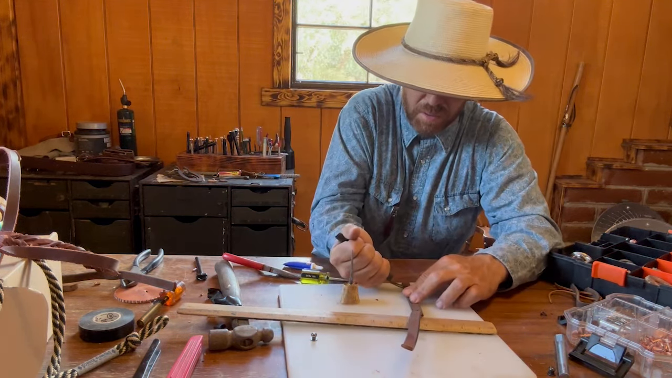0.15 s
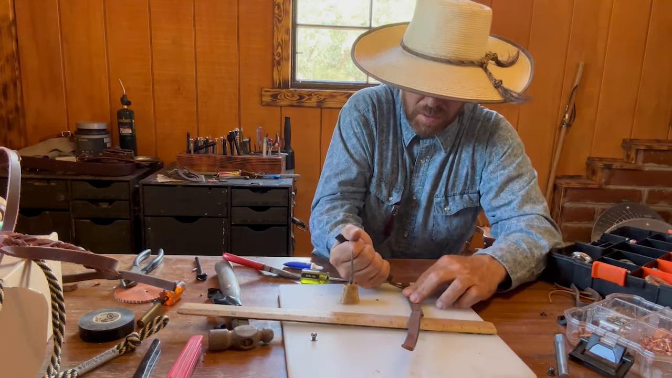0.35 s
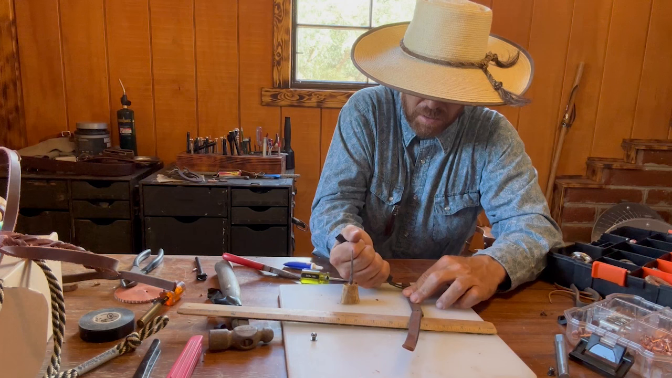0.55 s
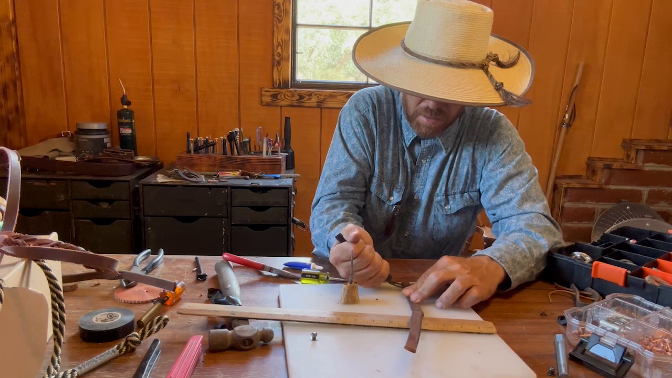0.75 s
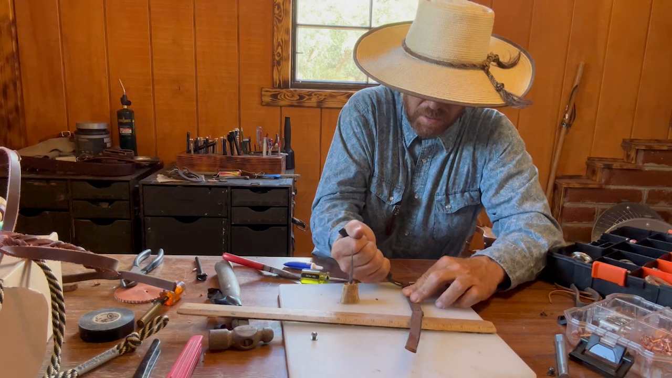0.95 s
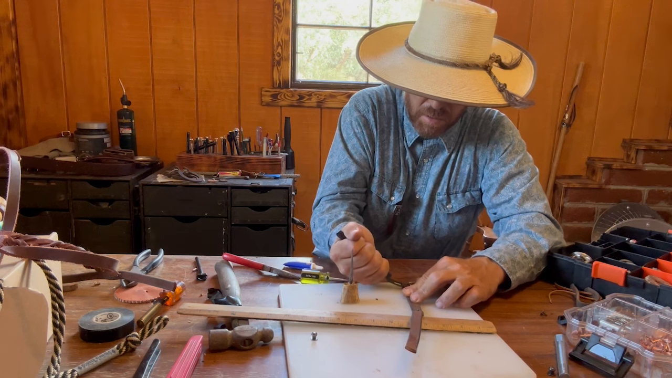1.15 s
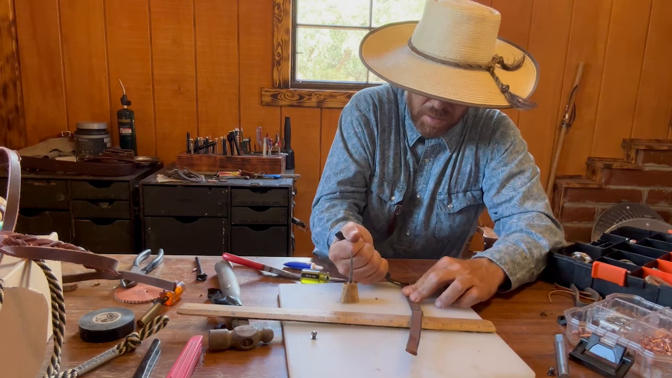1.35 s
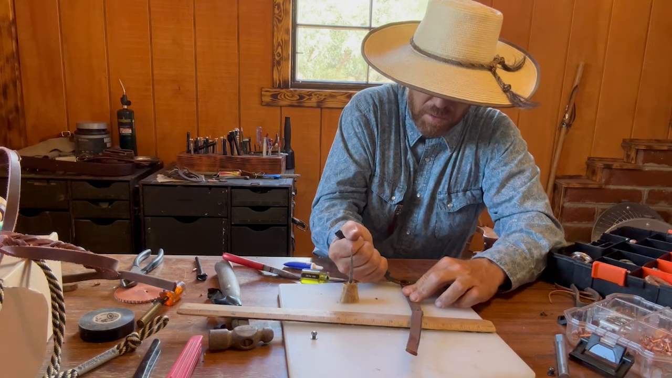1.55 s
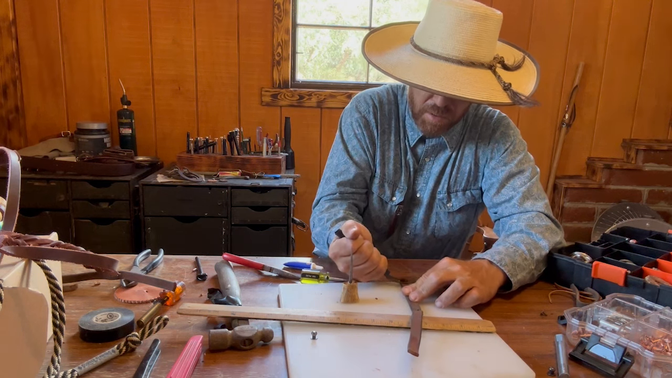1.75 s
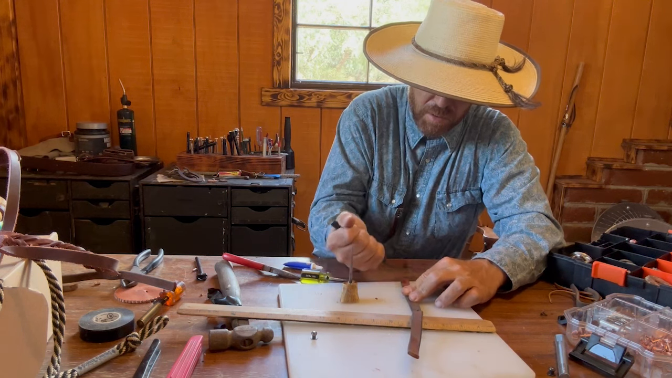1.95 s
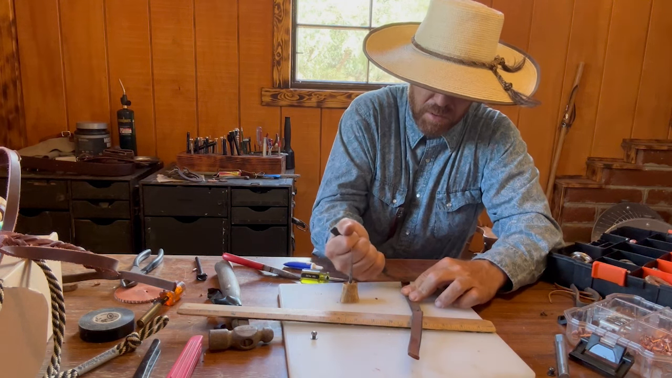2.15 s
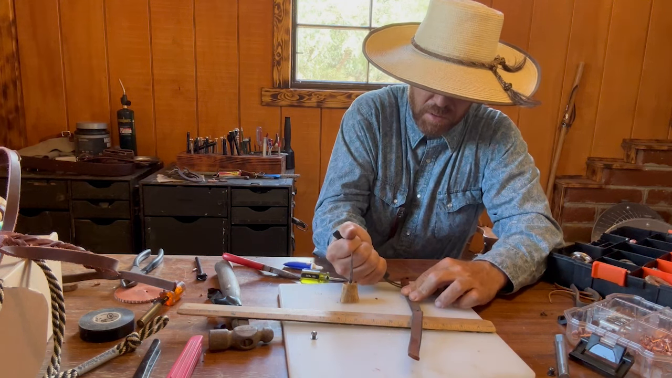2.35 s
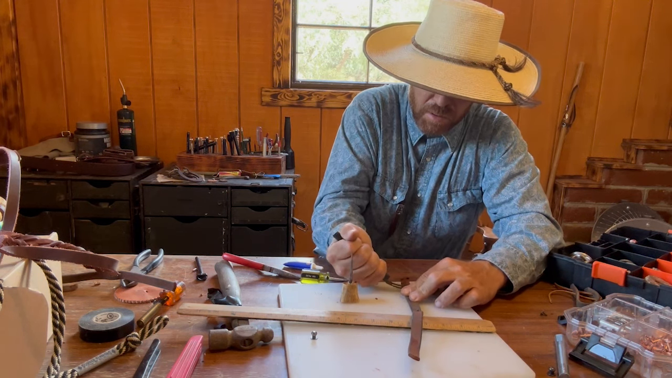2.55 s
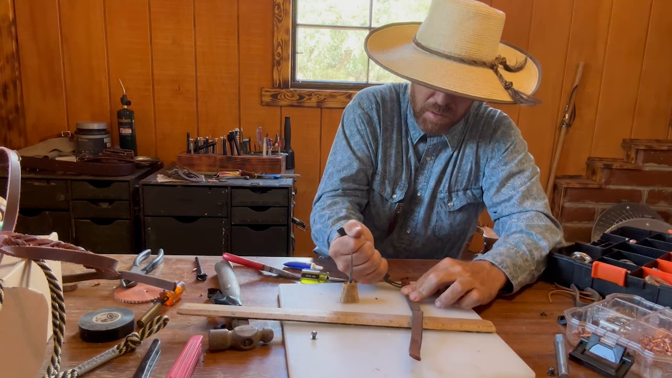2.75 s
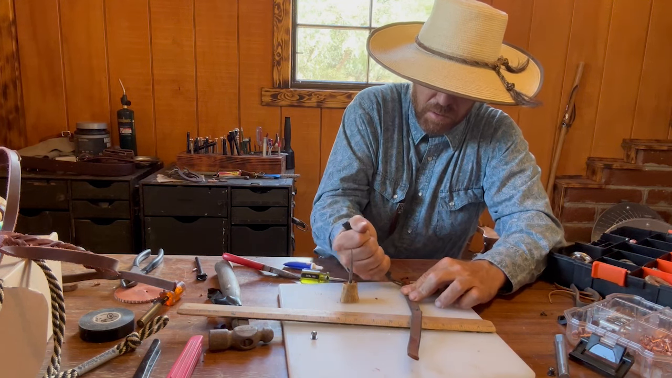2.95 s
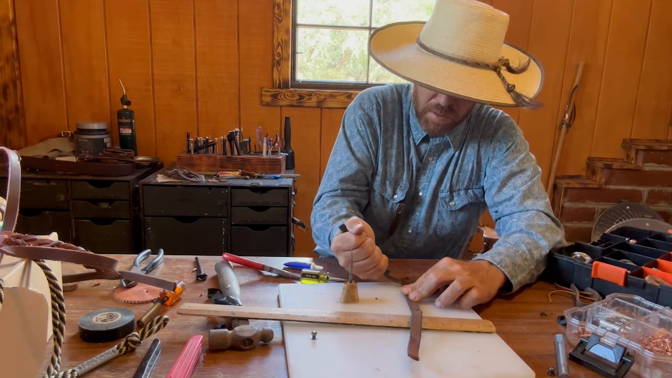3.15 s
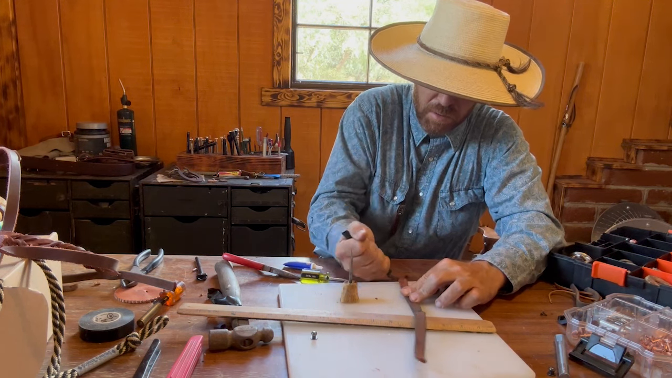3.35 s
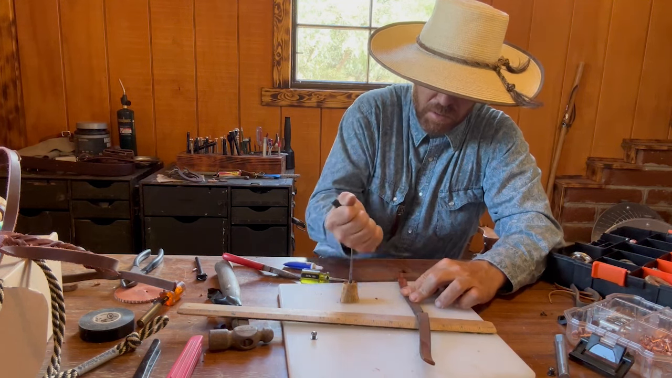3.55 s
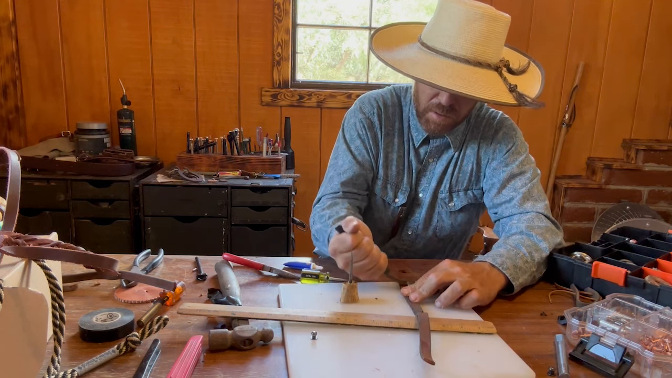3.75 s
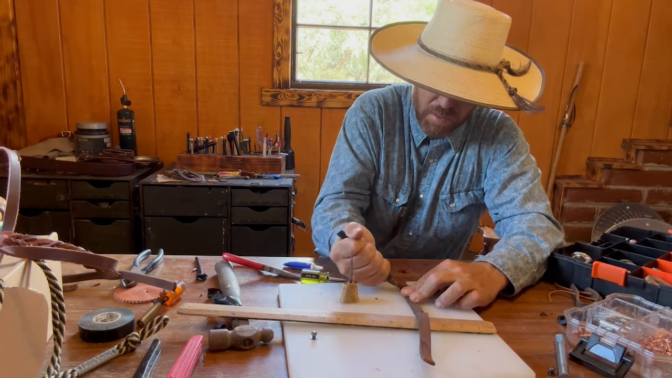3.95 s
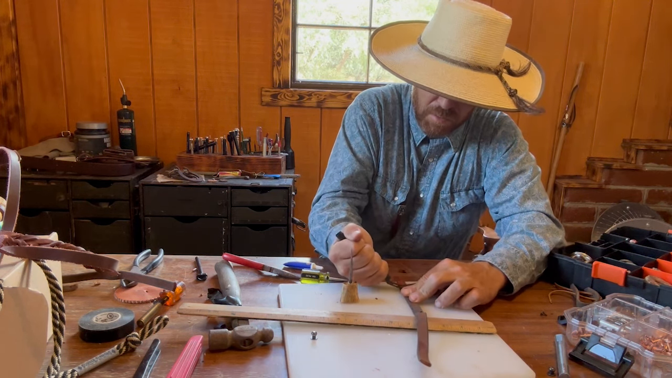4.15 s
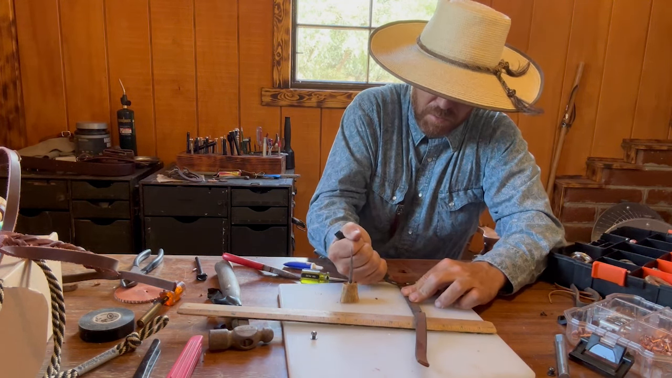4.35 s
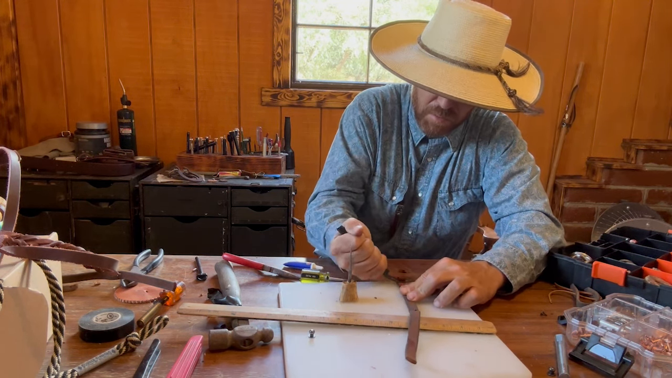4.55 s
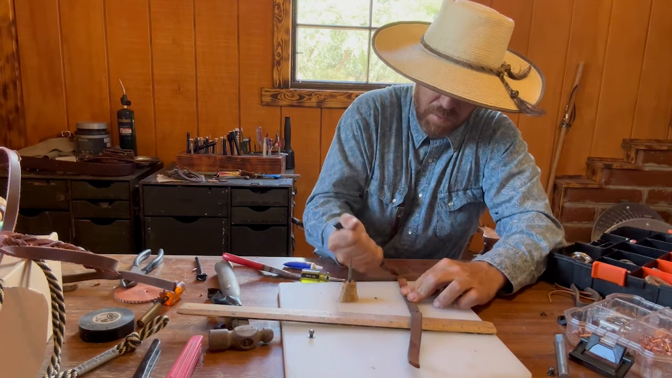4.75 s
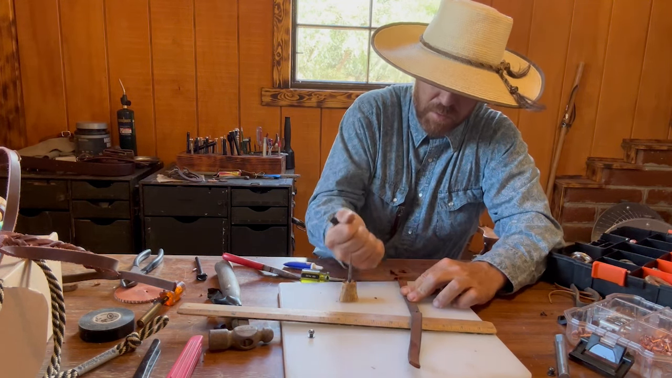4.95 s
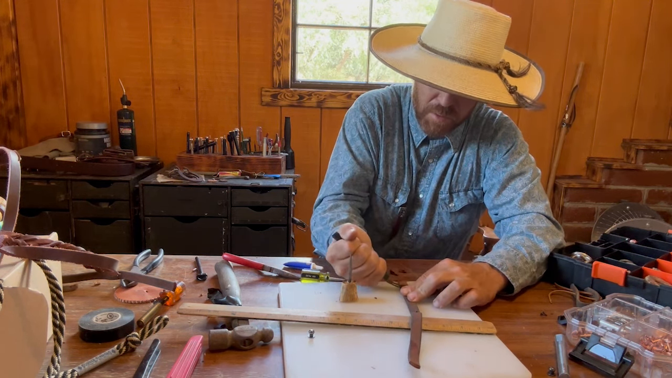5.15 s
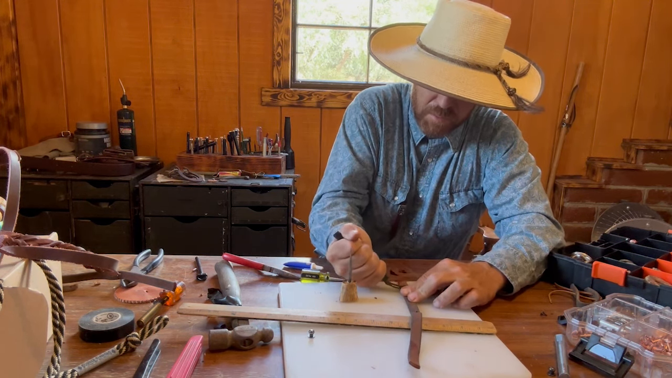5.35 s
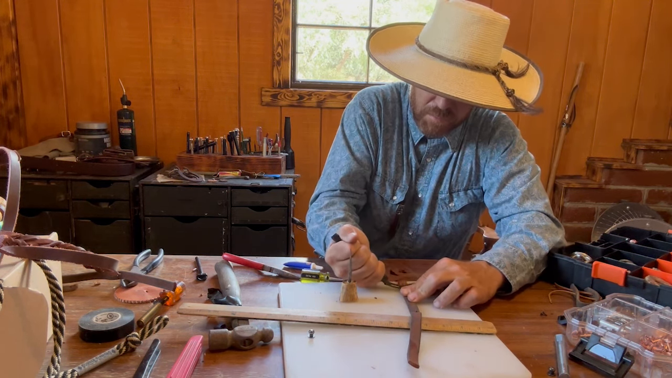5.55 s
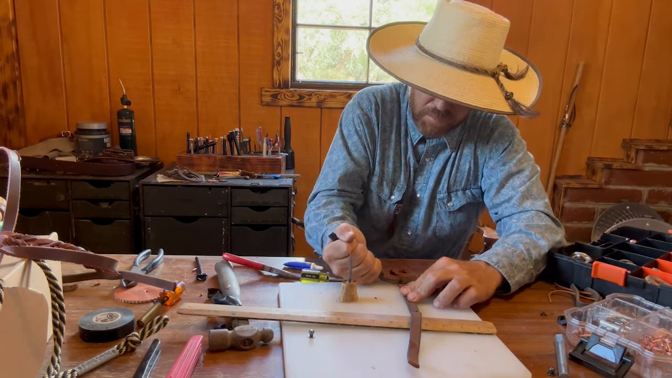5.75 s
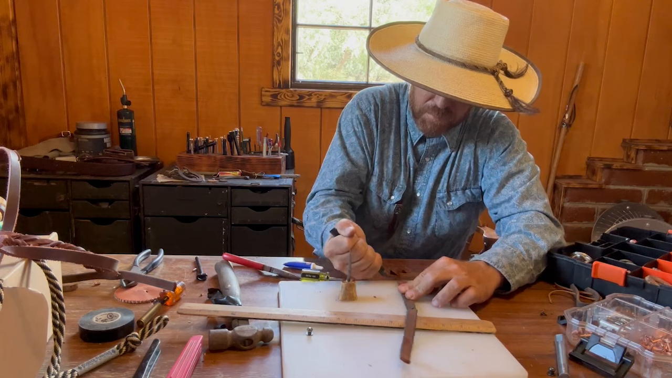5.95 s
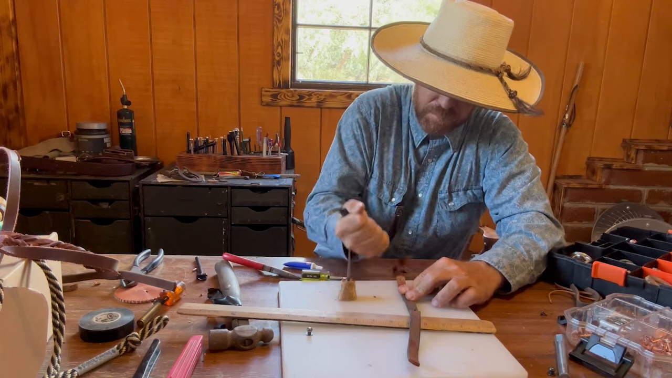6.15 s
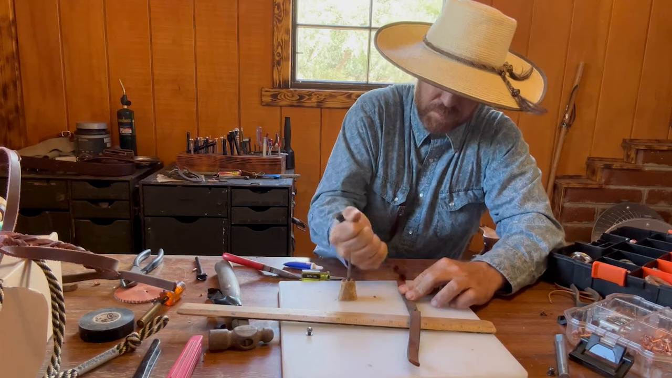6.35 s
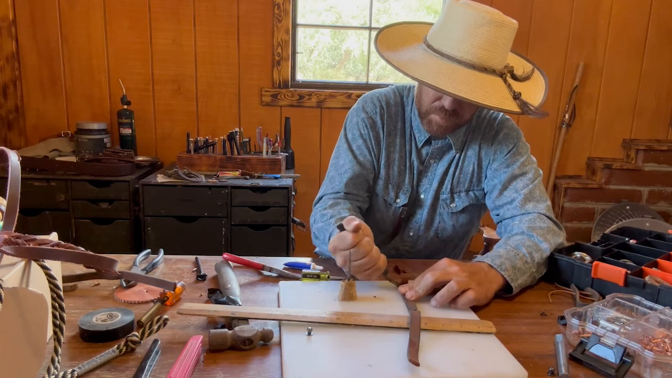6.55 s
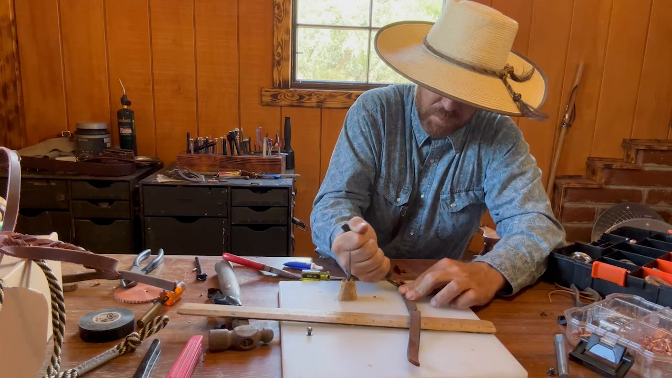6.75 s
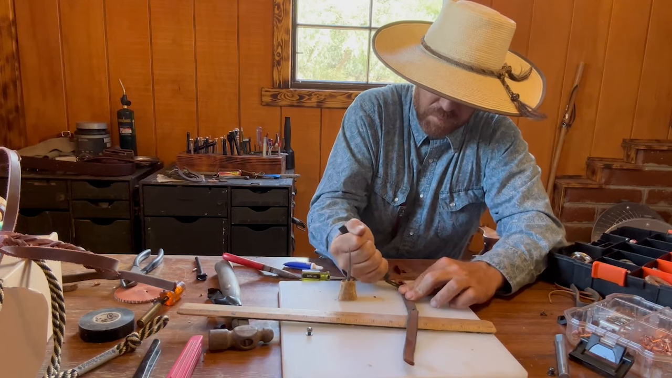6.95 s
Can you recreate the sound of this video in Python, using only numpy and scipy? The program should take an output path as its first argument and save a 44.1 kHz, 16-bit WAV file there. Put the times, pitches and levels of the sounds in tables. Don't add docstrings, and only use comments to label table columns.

```python
import sys
import numpy as np
from scipy import signal
from scipy.fft import rfft, irfft, next_fast_len
from scipy.io import wavfile
from scipy.ndimage import uniform_filter1d

SR = 44100
rng = np.random.default_rng(int(sys.argv[2]) if len(sys.argv) > 2 else 0)


def persist_wave(psi):
    counts = np.round(np.clip(psi, -1, 1) * 32767).astype(np.int16)
    wavfile.write(sys.argv[1], SR, np.atleast_2d(counts).T)


def boost(x):
    u = np.asarray(x, float) / 20
    return 10 ** u


N = 309141

# frequency in Hz, level in dB per Hz.
AIR_SPECTRUM = [(15, -37.5), (28, -12), (54, -3.5), (90, -11.5), (125, -9.5), (160, -13.5), (233, -14),
                (340, -10), (520, -12), (700, -22), (1100, -32.5), (1650, -35), (2000, -42), (10000, -53),
                (13000, -96.5)]
# time in seconds, level in dB.
AIR_LEVEL = [(0.0, -63), (1.6, -63), (3.3, -62.5), (4.75, -57.5), (5.5, -59.5), (7.01, -59)]
# frequency in Hz, left-right correlation from -1 to 1.
PORT_LIKENESS = [(60, 0.96), (180, 0.79), (550, 0.11), (1650, 0.056), (4970, -0.15), (15000, -0.81)]
HUM_HZ, HUM_DB = 120, -61.5

# time in seconds, level in dB.
LEANING = [(0.0, -60), (0.2, -56), (0.8, -62.5), (1.2, -58.5), (1.65, -83.5), (2.099, -74), (2.899, -64),
           (3.55, -57), (4.1, -55), (4.8, -53.5), (5.05, -55.5), (5.33, -60), (5.638, -67), (5.85, -54),
           (6.301, -56), (7.01, -59)]
# start in seconds, peak in dB, frequency in Hz.
THUDS = [(0.337, -44, 40.7), (3.019, -39.5, 69.5), (3.688, -34, 64.6), (3.75, -37.5, 57.3),
         (3.969, -40, 51.9), (4.326, -42, 49), (4.846, -34.5, 67.2), (4.991, -45, 58), (5.206, -42, 54.1),
         (5.299, -43, 54.5), (6.72, -40.5, 61.7)]

# frequency in Hz, decay time t60 in seconds.
WALL_DECAY = [(60, 0.27), (250, 0.7), (700, 0.47), (1900, 0.46), (2800, 0.5), (5000, 0.49), (9000, 0.39),
              (14000, 0.23)]
# frequency in Hz, level in dB.
WALL_COLOUR = [(60, -5.5), (300, -6), (700, -1.5), (1050, -6), (1800, -10), (2300, -5), (2850, 1),
               (3450, -4), (4150, -1), (4800, -5.5), (8000, -5), (13000, -10.5)]

# middle in seconds, half length in seconds, level in dB, centre in Hz, width in Hz.
SHUFFLES = [(0.003, 0.031, -78, 1500, 500), (0.306, 0.074, -76, 1530, 450), (0.444, 0.075, -77, 1490, 450),
            (2.594, 0.55, -79, 1150, 599.5), (3.238, .02, -57, 1100, 251),
            (3.313, 0.022, -50.5, 1133, 351.2), (3.95, .07, -68, 1150, 601), (4.092, .07, -69.5, 1192, 703),
            (4.46, .03, -62.5, 1097, 300), (4.55, 0.035, -56, 1090, 250), (5.154, 0.16, -73.5, 1200, 599),
            (5.422, 0.079, -70, 1300, 900), (5.843, .035, -57.5, 1207, 350), (6.62, 0.041, -69, 1154, 600),
            (6.701, 0.04, -68, 1300, 696), (6.789, 0.037, -68, 1150, 600), (6.938, 0.072, -69.5, 1200, 602)]
# start in seconds, drag in seconds, rasp in dB, fibre hiss above the rasp in dB.
BITES = [(0.712, 0.0071, -65.5, -25), (0.742, 0.0036, -77.5, 6.5), (1.376, 0.0064, -57, -7),
         (1.41, 0.005, -67.5, -11), (1.783, 0.038, -51.5, -10.5), (2.94, .008, -66.5, -1),
         (2.978, 0.024, -53.5, -5.5), (3.225, 0.0078, -57.5, -15), (3.8, 0.017, -68.5, 3),
         (4.181, .01, -61, 2), (4.218, .03, -56, -2.5), (4.435, 0.057, -61, 4.5), (4.53, 0.021, -57.5, -2),
         (5.084, .03, -72.5, -5.5), (5.55, 0.013, -63.5, -3), (5.64, 0.058, -47, -4.5),
         (6.479, 0.025, -67, -12)]
# middle in seconds, half length in seconds, rasp in dB, fibre hiss above the rasp in dB.
SLIDES = [(0.8, .04, -95, -9), (0.936, .022, -64, -3), (1.24, .04, -69, -18), (1.31, .04, -72.5, -20),
          (1.47, .05, -82, 1), (1.575, .045, -63, -1.5), (3.1, .07, -62.5, -4.5), (3.19, .05, -62.5, -1),
          (3.305, .03, -54.5, -8.5), (4.38, .05, -62.5, 0.5), (4.59, .04, -70.5, 3.5),
          (5.19, .05, -78, -0.5), (5.399, .14, -87, 1), (5.845, .045, -58.5, -2.5), (5.92, .05, -64, -4),
          (6.68, .045, -72, -2)]
# frequency in Hz, width in Hz, level in dB.
RASP_MODES = [(1060, 130, 0), (1300, 100, -4), (1790, 120, -9), (2150, 120, -10), (2720, 130, -11),
              (4300, 300, -17), (5600, 300, -17)]
# frequency in Hz, level in dB per Hz.
FIBRE_SPECTRUM = [(350, -33), (600, -19.5), (1280, 4.5), (1700, -6.5), (2070, -4.5), (3680, -21.5),
                  (8270, -17), (10300, -28.5), (11700, -25), (16000, -32)]
SWELL_DB = 12
BITE_S, LET_GO_DB_PER_S = 0.005, 260
TEAR_S, TEAR_DB, TEAR_HISS_DB = 0.027, -35, -8.5
WANDER_DB, WANDER_HZ = 4, 12

# frequency in Hz, level in dB, decay time t60 in seconds.
FRAME_MODES = [(71.2, -1.5, 0.25), (51, -16, 0.2), (124.5, -10, 0.3)]
# frequency in Hz, level in dB, decay time t60 in seconds.
BENCH_MODES = [(132, -2, .17), (167.4, -1.5, 0.11), (199, -4, 0.15), (255, -4.5, 0.068), (342, -2.5, 0.11),
               (381, -9.5, 0.17), (488, -18, .06)]
# frequency in Hz, level in dB, decay time t60 in seconds.
TOOL_MODES = [(1300, 4.5, 0.033), (704, -7.5, 0.098), (1760, -23, .03), (2260, -3.5, 0.046),
              (2780, -4.5, 0.078), (3050, -18.5, 0.017), (3846, -6, 0.041)]
# frequency in Hz, level in dB per Hz.
CRACK_SPECTRUM = [(290, -37.5), (500, -5), (1870, -2.5), (3250, -5.5), (4150, -5.5), (6900, -9.5),
                  (8090, -6.5), (10200, -20), (12700, -14), (16000, -34.5)]
# start in seconds, peak in dB,
# treble of the crack in dB, tool ring in Hz, weight into the bench in dB.
TOUCHES = [(0.936, -45, -25, 1450, -8), (1.384, -58, -17, 1070, -17.5), (1.788, -40, -22, 1343, -24.5),
           (2.945, -50.5, -8.5, 1304, -21.5), (2.983, -34.5, -16, 1070, -7), (3.008, -34, -22, 1060, -10.5),
           (3.19, -42.5, -20, 1320, -11.5), (3.23, -36.5, -14, 1080, -22), (3.302, -31.5, -6, 1096, -19.5),
           (3.795, -37.5, -21.5, 1241, -19), (4.185, -52.5, -3.5, 1066, -11),
           (4.224, -32.5, -6.5, 1020, -11.5), (4.437, -42.5, -1, 1120, -18),
           (4.535, -47.5, -27, 1058, -15.5), (5.08, -37, -20.5, 1101, -19.5),
           (5.270, -54, -25.5, 2760, -14), (5.555, -47.5, -14, 1247, -12), (5.646, -30, -19.5, 1050, -11.5),
           (6.475, -36.5, -17.5, 1261, -22), (6.794, -52, -53, 1020, -28)]
# start in seconds, peak in dB,
# treble of the crack in dB, tool ring in Hz, weight into the bench in dB.
BOUNCES = [
    (3.358, -3, -9.5, 1020, -22),
    (4.668, -2.5, -12.5, 1057, -24.5),
    (6.0088, -3, -2, 1010, -23.5),
]
# start in seconds, peak in dB,
# treble of the crack in dB, tool ring in Hz, weight into the bench in dB.
BLOWS = [
    (1.8375, -12.5, -23.5, 1300, -17.5),
    (3.345, -1, -5, 1179, -29.5),
    (4.655, 0, 2, 1300, -26),
    (5.9955, -2, -7.5, 1249, -35),
]
REBOUND_S = 0.00102

# frequency in Hz, left-right difference in dB.
LEAN = [(100, 0.5), (700, 3), (2400, 2), (4400, 2), (8000, 3), (14000, -1)]
# lower edge in Hz, upper edge in Hz, level needed to pass in dB.
WEAK_BANDS = [(9750, 10900, -52), (10900, 11600, -93), (11600, 12300, -95), (12300, 13100, -93),
              (13100, 13850, -91), (13850, 15300, -54), (15300, 16050, -92), (16050, 16900, -62)]
EDGE_HZ, CEILING = 16900, 1.05


def clock():
    return np.arange(0, N + 16, 16) / SR


def evened(x):
    return x / np.sqrt(np.mean(x ** 2) + 1e-20)


def read(points, hz):
    f, value = np.transpose(points)
    return np.interp(np.log(hz + 1), np.log(f + 1), value)


def colour(x, points):
    size = next_fast_len(x.shape[-1])
    gain = boost(read(points, np.fft.rfftfreq(size, 1 / SR)))
    return irfft(rfft(x, size) * gain, size)[..., :x.shape[-1]]


def slow(hz):
    return evened(signal.lfilter(*signal.butter(2, hz, fs=SR), rng.standard_normal(N)))


def ring(modes, seconds):
    t = np.arange(round(seconds * SR)) / SR
    return sum(boost(db - 60 * t / t60) * np.sin(2 * np.pi * hz * t) for hz, db, t60 in modes)


def air():
    frames, hz = N // 256 + 5, np.fft.rfftfreq(1024, 1 / SR)
    a, b, c, d, patches = rng.standard_normal((frames, 513, 5)).T
    patches = evened(uniform_filter1d(uniform_filter1d(patches, 10, 0), 16, 1))
    same = np.clip(read(PORT_LIKENESS, hz), -1, 1)[:, None]
    left, other = a + 1j * b, c + 1j * d
    right = same * left + np.sqrt(1 - same ** 2) * other
    z = np.array([left, right]) * boost(read(AIR_SPECTRUM, hz)[:, None] + 1.3 * patches)
    noise = signal.istft(z, nperseg=1024, noverlap=768)[1][:, :N]
    level_db = np.interp(np.arange(N) / SR, *np.transpose(AIR_LEVEL))
    tone = boost(level_db + 2.0) * evened(noise)
    hum = np.sin(2 * np.pi * np.cumsum(HUM_HZ + 0.097 * slow(9.9)) / SR)
    return tone + boost(HUM_DB + 1.6 * slow(5.4)) * hum


def rocking():
    s, db = np.transpose(LEANING)
    stir = rng.standard_normal((2, N))
    stir = stir + 0.099 * stir.sum(0)
    low = colour(stir, [(25, -28.5), (42, -1), (60, -7), (85, -8.5), (130, -30.0), (300, -69.5)])
    return boost(np.interp(np.arange(N) / SR, s, db) - 1.0) * evened(low)


def thuds():
    out, t = np.zeros((2, N + SR)), np.arange(round(.3 * SR)) / SR
    step = np.array([[.45], [-.45]])
    shape = t / .022 * np.exp(-t / .022)
    for s, db, hz in THUDS:
        wave = shape * np.sin(2 * np.pi * hz * t + step)
        out[:, round(s * SR):][:, :len(t)] += boost(db + 3) * wave
    return out[:, :N]


def room(x):
    taps = np.zeros((2, SR))
    at = np.arange(160, SR - 12, 12) + rng.integers(0, 12, (2, (SR - 161) // 12))
    np.put_along_axis(taps, at, rng.choice([-1., 1.], at.shape), 1)
    hz, t, z = signal.stft(taps, SR, nperseg=512)
    shared = np.clip(read(PORT_LIKENESS, hz), 0, 1)[:, None]
    z[1] = shared * z[0] + np.sqrt(1 - shared ** 2) * z[1]
    decay = boost(-60 * t / read(WALL_DECAY, hz)[:, None])
    tail = signal.istft(z * decay, SR, nperseg=512)[1]
    tail = colour(tail / np.linalg.norm(tail[0]), WALL_COLOUR)
    return signal.fftconvolve(x[None], tail, axes=1)[:, :N]


def swell(middle, half):
    return boost(-SWELL_DB * ((clock() - middle) / half) ** 2)


def shuffles(tears):
    out = np.zeros((2, N))
    for middle, half, db, hz, width_hz in SHUFFLES:
        span = slice(max(round((middle - 2 * half) * SR), 0), round((middle + 2 * half) * SR))
        band = signal.butter(2, [hz - width_hz / 2, hz + width_hz / 2], "band", fs=SR)
        shape = np.interp(np.arange(N)[span] / SR, clock(), swell(middle, half))
        out[:, span] += boost(db) * shape * evened(signal.lfilter(*band, tears[:, span]))
    return out


def pressure():
    t = clock()
    power = np.zeros((2, len(t)))
    for s, drag, db, hiss_db in BITES:
        onset = np.clip((t - s) / BITE_S, 0, 1)
        release = boost(-LET_GO_DB_PER_S * np.maximum(t - s - BITE_S - drag, 0))
        power += (boost(db + np.array([[0], [hiss_db]])) * onset * release) ** 2
    for middle, half, db, hiss_db in SLIDES:
        power += (boost(db + np.array([[0], [hiss_db]])) * swell(middle, half)) ** 2
    for s, *_ in BLOWS[1:]:
        shape = np.clip((t - s) / TEAR_S + 1, 0, 1) * (t < s + TEAR_S / 2)
        power += (boost(TEAR_DB + np.array([[0], [TEAR_HISS_DB]])) * shape) ** 2
    return [np.interp(np.arange(N) / SR, t, np.sqrt(p)) for p in power]


def strokes():
    rasp, hiss = pressure()
    clumps = boost(2.2 * slow(90.) + 3 * slow(22.))
    sizes = boost(1.9 * np.minimum(rng.exponential(1, N), 4))
    tears = rng.standard_normal((2, N)) * sizes * (rng.random(N) < .4)
    tears = clumps * (tears + .5 * tears.sum(0))
    shake = np.zeros(N)
    for hz, width_hz, db in RASP_MODES:
        t60 = np.log(1000) / np.pi / width_hz
        mode = signal.oaconvolve(tears.sum(0), ring([(hz, db, t60)], .04))[:N]
        shake += boost(WANDER_DB * slow(WANDER_HZ)) * mode
    grit = evened(colour(tears, [(300, -28.5), (700, -21.0), (1500, -4.0), (2200, -7.0), (4500, -22.5)]))
    body = evened(evened(shake) + .6 * grit)
    fizz = evened(colour(colour(tears, FIBRE_SPECTRUM), [(2000, -22), (4000, -8.0)]))
    return boost(1.0) * (rasp * body + hiss * fizz) + shuffles(tears)


def boom(modes, rise_s):
    t = np.arange(round(.8 * SR)) / SR
    step = 0.31 * np.array([[1], [-1], [0]])
    waves = np.zeros((3, len(t)))
    for k, (hz, db, t60) in enumerate(modes):
        phase = (-1) ** k * 0.17 * step
        waves += boost(db - 60 * t / t60) * np.sin(2 * np.pi * hz * t + phase)
    return waves * (1 - np.exp(-t / rise_s))


def crack(dice, treble_db, spread_s, chatter_s):
    hz = np.fft.rfftfreq(1024, 1 / SR)
    when, size, apart = dice.T
    lag = when * chatter_s + 4e-5 * np.array([apart, -apart - 1])
    contacts = (size * np.exp(-2j * np.pi * hz[:, None, None] * lag)).sum(2).T
    allround = np.linalg.norm(size) + 0 * hz
    delay_phase = spread_s * (2 * np.sqrt(1000 * hz) - hz / 4) + hz * 44 / SR
    bend = np.exp(-2j * np.pi * delay_phase)
    tilt_db = read([(1500, 0.12), (4000, 0.74)], hz) * (treble_db + 9.5)
    gain = boost(read(CRACK_SPECTRUM, hz) + tilt_db)
    wave = irfft(np.vstack([contacts, allround]) * bend * gain, 1024)
    return wave / abs(wave[:2]).max()


def blows(rows, crack_db, ring_db, spread_s, chatter_s, deep_db, top_db, ring_s, rebound):
    out = np.zeros((3, N + SR))
    dice = np.stack([rng.random((len(rows), 7)), *rng.standard_normal((2, len(rows), 7))], 2)
    bench = boost(deep_db) * boom(FRAME_MODES, 0.0054) + boost(top_db) * boom(BENCH_MODES, 0.001)
    for (s, db, treble_db, hz, weight_db), die in zip(rows, dice):
        tool = ring([(hz, 0, ring_s)], .1) + boost(-18.5) * ring(TOOL_MODES, .1)
        tool *= 1 - np.exp(-np.arange(len(tool)) / SR / 0.00024)
        at = round(s * SR)
        wave = crack(die, treble_db, spread_s, chatter_s)
        wave[:2] -= rebound * np.roll(wave[:2], round(REBOUND_S * SR), 1)
        out[:, at - 44:at + 980] += boost(db + crack_db) * wave
        tool_db = db + ring_db + np.array([[0], [0], [-5]])
        out[:, at + 30:at + 30 + len(tool)] += boost(tool_db) * tool
        out[:, at:at + bench.shape[1]] += boost(db + weight_db) * bench
    return out[:, :N]


def scene():
    hits = blows(BLOWS, 0.17, -10, 0.00225, 0.0012,
                 deep_db=-0.85, top_db=-4, ring_s=0.014, rebound=0.46)
    hits += blows(BOUNCES, -9, -3.5, .0008, 0.0023,
                  deep_db=-3.5, top_db=-0.4, ring_s=0.018, rebound=.1)
    hits += blows(TOUCHES, -3.1, -6.0, 0.0018, 0.0051,
                  deep_db=-9.5, top_db=1.44, ring_s=0.016, rebound=0.061)
    rubs = strokes()
    left, right = hits[:2] + rubs
    left = colour(left, [(f, db / 2) for f, db in LEAN])
    right = colour(right, [(f, -db / 2) for f, db in LEAN])
    echo = room(hits[2] + boost(0.5) * rubs.mean(0))
    return [left, right] + echo + thuds() + rocking() + air()


def top_cut(x):
    return signal.sosfilt(signal.butter(12, 16940, fs=SR, output="sos"), x)


def record(dry):
    held = CEILING * np.tanh(dry / CEILING)
    rolled = signal.lfilter(*signal.butter(2, 34., "high", fs=SR), held)
    hz, t, z = signal.stft(rolled, SR, nperseg=512)
    for low, high, need_db in WEAK_BANDS:
        band = (hz > low) & (hz < high)
        power = (abs(z[:, band]) ** 2).sum(1).mean(0)
        z[:, band] *= power > boost(2 * need_db)
    z[:, hz > EDGE_HZ] = 0
    mix = signal.istft(z, SR, nperseg=512)[1][:, :N]
    return top_cut(mix)


dry = scene()
out = record(dry)
persist_wave(out)
```